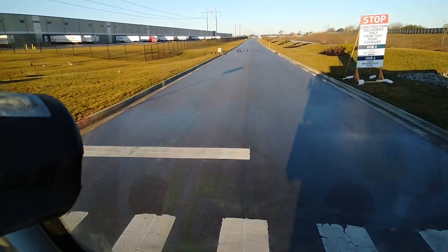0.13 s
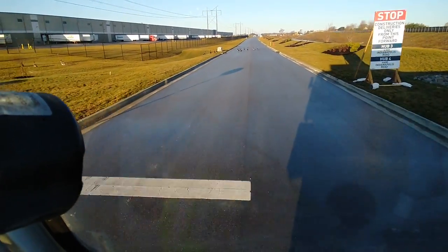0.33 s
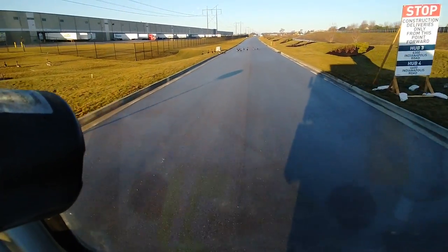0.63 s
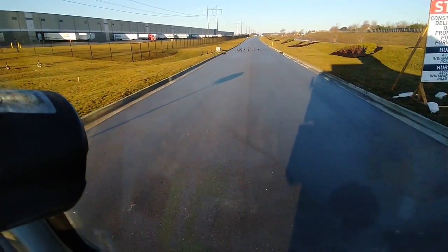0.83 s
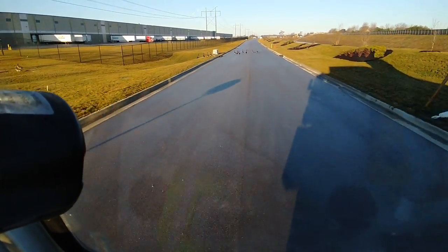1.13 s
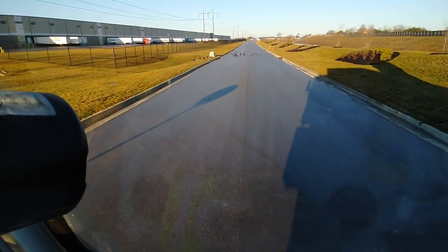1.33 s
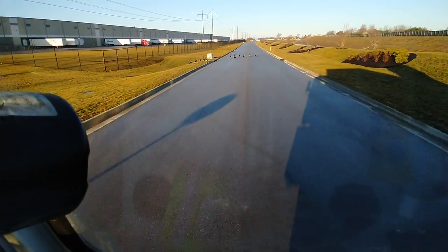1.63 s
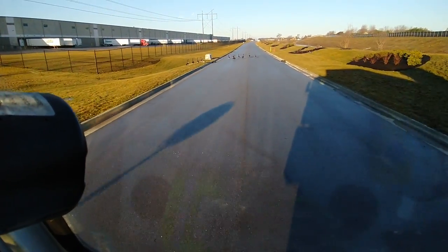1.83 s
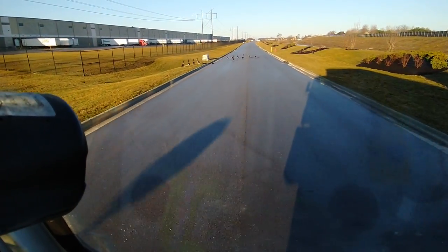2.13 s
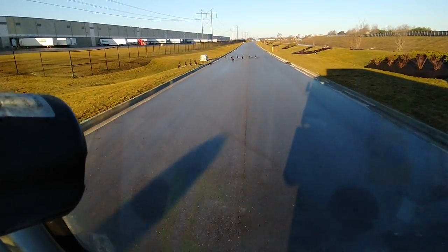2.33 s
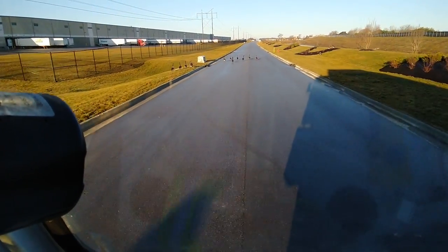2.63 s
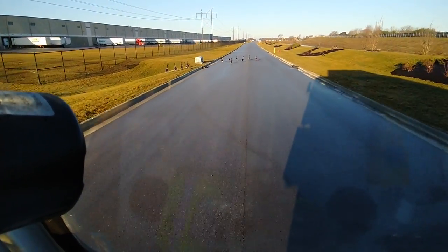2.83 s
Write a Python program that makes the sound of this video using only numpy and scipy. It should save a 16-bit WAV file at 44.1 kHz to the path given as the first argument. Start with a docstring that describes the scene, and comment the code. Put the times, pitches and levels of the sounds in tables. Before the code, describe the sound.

A diesel vehicle drives along, engine humming and slowly rising, with bumps and rattles.

```python
"""A diesel vehicle gathers speed along a road, heard from on board.
Throughout, the engine's firings hum and clatter over the boom of the cab and the roar of the tyres.
In the first second, bumps thump through the body and loose fittings squeak by stick-slip.
Near 1.1 s a shaken panel drones and air hisses faintly; from 1.7 s more bumps follow.
After 2 s a thinner hiss enters, a loose panel knocks and a latch clicks; last come bumps and a squeak."""
import sys
import numpy as np
from scipy import signal
from scipy.fft import rfft, irfft
from scipy.io import wavfile
from scipy.ndimage import uniform_filter1d

SR = 44100
rng = np.random.default_rng(int(sys.argv[2]) if len(sys.argv) > 2 else 0)


def persist_wave(psi):
    """Save psi, clipped to +-1, as 16-bit WAV."""
    counts = np.round(np.clip(psi, -1, 1) * 32767).astype(np.int16)
    wavfile.write(sys.argv[1], SR, np.atleast_2d(counts).T)


N = 130977

# Noise spectra. Each row: frequency in Hz, relative density in dB.
HISS_SPECTRUM = [(1500, -22.5), (3200, 9.5), (4200, 6.5), (5500, 6.5), (7000, -2), (8000, -13)]
FIZZ_SPECTRUM = [(3000, -26.5), (5500, -5.5), (6600, 1), (7500, -4.5), (8200, -4.5)]
ROAR_SPECTRUM = [(150, -47.5), (250, -1), (380, -7), (420, -3.5), (506, -10.5), (552, -5.5), (656, -13.5),
                 (715, -8), (802, -14), (1010, -16), (1470, -17), (1720, -15), (2040, -16.5), (2500, -16.5),
                 (3690, -27.5), (6950, -33), (7800, -44.5), (10100, -63), (17200, -120)]
BOOM_SPECTRUM = [(20, -31.5), (44, -20.5), (58, -19), (85, -16), (110, 1.5), (135, -1), (200, 2),
                 (225, -5.5), (300, -8.5), (400, -23), (800, -46.5)]
ENGINE_RUMBLE_SPECTRUM = [(20, -38.5), (44, -22.5), (58, -20), (78, -2), (98, 2.5), (130, -22), (400, -61)]
# Level curves. Each row: time in seconds, level in dB.
HISS_DB = [(0, -42.5), (.04, -42), (.09, -51), (.5, -68.5), (.96, -67.5), (1.0, -50), (1.06, -40.5),
           (1.15, -42.5), (1.24, -50.5), (1.36, -45), (1.5, -49.5), (1.75, -60), (1.99, -59), (2.06, -52.5),
           (2.25, -52), (2.97, -58.5)]
FIZZ_DB = [(0, -62.5), (2.0, -63), (2.05, -47), (2.55, -46), (2.97, -49.5)]
ROAR_DB = [(0, -34.5), (.55, -35), (.92, -34.5), (1.1, -33.5), (1.6, -34), (2.3, -33.5), (2.97, -35)]
BOOM_DB = [(0, -24.5), (.2, -25), (.3, -28), (.5, -27.5), (.75, -28), (1.05, -26), (1.2, -27), (1.43, -29),
           (1.7, -26.5), (1.93, -27), (2.28, -25.5), (2.38, -29.5), (2.48, -28), (2.8, -28.5),
           (2.97, -24.5)]
DRONE_DB = [(0, -56), (.33, -58), (.42, -42.5), (.88, -42.5), (1.0, -41.5), (1.12, -34.5), (1.25, -47),
            (1.82, -46), (1.89, -37.5), (1.96, -52), (2.55, -47), (2.7, -42.5), (2.97, -42)]
# Road bumps and squeaks. Each row: start in seconds, length in seconds, pitch in Hz, level in dB.
BUMPS = [(.005, 0.062, 190, -25), (.095, .09, 135.8, -22), (.345, 0.093, 141.7, -23),
         (.595, 0.061, 126.6, -18.5), (.615, 0.058, 181, -21), (.815, 0.093, 141.6, -21.5),
         (1.68, .06, 192.6, -27), (1.8, .07, 144.2, -23.5), (1.985, 0.0758, 136.4, -23),
         (2.705, .08, 194.2, -24.5), (2.76, 0.079, 91.3, -24.5), (2.79, 0.068, 196, -23)]
SQUEAKS = [(.112, .065, 5580, -50), (.109, .05, 7130, -56), (.214, .034, 6950, -47), (.213, .03, 3420, -42),
           (.365, .056, 5530, -53), (.598, .03, 7150, -53), (.603, .04, 4420, -49),
           (.691, .026, 7110, -45.5), (.69, .03, 3480, -45), (2.891, .04, 4410, -42.5)]
# Knocks of a loose panel and clicks of a small latch.
# Each row: start in seconds, then peak levels in dB of the panel's low mode, its middle mode, the latch.
RATTLES = [(.633, -39, -31.5, -52), (2.153, -49, -32, -46), (2.192, -50, -44, -28.5),
           (2.274, -36, -30, -32), (2.283, -29, -27, -30), (2.292, -41, -31, -36), (2.332, -36, -33, -46),
           (2.367, -39, -43, -26.5), (2.382, -43, -42, -33), (2.46, -28.5, -26, -37),
           (2.467, -36, -34, -42), (2.515, -50, -33, -50), (2.616, -36, -32, -41),
           (2.623, -40, -30.5, -49.5)]
# Two low modes and a middle one of the panel, then the high mode of the latch.
# Each row: frequency in Hz, rise and decay time in seconds.
RATTLE_MODES = [(505, 0.0065), (700, .005), (1670, 0.0023), (2660, 0.0019)]
# Engine-shaken panels. Each row: frequency in Hz, width in Hz, level in dB.
PANEL_MODES = [(433, 27, -48.5), (563, 28, -49), (1610, 23, -55.5), (1700, 34, -49.5), (1777, 19, -51.5),
               (1844, 22, -52.5), (1922, 56, -53.5), (2220, 27, -54.5), (2418, 26, -51), (2567, 69, -54.5),
               (2977, 45, -54.5), (3460, 20, -56.5), (4005, 35, -61.5)]
DRONE_MODES = [(703.6, 20.7, -1.5), (750, 24, -4.5)]  # one panel; levels relative to DRONE_DB
# Crankshaft speed. Each row: time in seconds, turns per second.
CRANK_HZ = [(0, 25.3), (.45, 26.3), (.72, 27.4), (.95, 27.45), (1.25, 28.45), (1.7, 28.9), (2.25, 29.6),
            (2.5, 29.6), (2.97, 31.3)]
# Firing note. Each row: time in seconds, level in dB, level of its octave in dB.
FIRING_DB = [(0, -36.5, -30), (.22, -35.5, -39), (.33, -43, -33), (.44, -46, -33.5), (.55, -29, -30.5),
             (.75, -32.5, -35), (1.2, -31, -34.5), (1.65, -33, -32), (1.8, -35, -33), (2.15, -31, -31.5),
             (2.4, -33, -36), (2.54, -40.5, -33), (2.8, -30.5, -33), (2.97, -29.5, -36)]
# Weaker engine orders. Each row: multiple of crankshaft speed, level in dB relative to BOOM_DB.
WEAK_ORDERS = [(1.5, -33), (3.5, -15.5), (4, -12), (4.5, -9.5), (5, -6), (6.5, -13), (7, -14), (8.5, -21.5),
               (9, -22.5), (14, -30)]
FIRINGS_PER_TURN = 3


def amp(db):
    """Decibels to gain."""
    return 10 ** (np.asarray(db) / 20)


def unit_rms(x):
    """Scales to rms 1."""
    return x / np.sqrt(np.mean(x ** 2) + 1e-20)


def curve(points):
    """A (seconds, value) table at every sample."""
    return np.interp(np.arange(N) / SR, *np.transpose(points))


def add(mix, start_s, sound):
    """Mixes a sound in at start_s."""
    part = mix[max(round(start_s * SR), 0):][:len(sound)]
    part += sound[:len(part)]


def drift(rate_hz):
    """Slow random wander; rms 1."""
    lowpass = np.exp(-(np.fft.rfftfreq(N, 1 / SR) / rate_hz) ** 2)
    return unit_rms(irfft(rfft(rng.standard_normal(N)) * lowpass, N))


def ring(x, hz, width_hz):
    """Passes x through one resonance; rms 1."""
    bins_hz = np.fft.rfftfreq(len(x), 1 / SR)
    return unit_rms(irfft(rfft(x) / (1 + 1j * (bins_hz - hz) / width_hz) ** 2, len(x)))


def noise(spectrum):
    """Steady noise, its spectrum interpolated over log frequency; rms 1."""
    hz, db = np.transpose(spectrum)
    bins_db = np.interp(np.log(np.fft.rfftfreq(N, 1 / SR) + 1), np.log(hz + 1), db)
    return unit_rms(irfft(rfft(rng.standard_normal(N)) * amp(bins_db), N))


def unsteady_note(length_s, hz, width_hz, skew=0.77):
    """A short note that swells and dies; a random walk of phase widens its pitch."""
    progress = np.arange(0, length_s, 1 / SR) / length_s
    steps_rad = rng.standard_normal(SR)[:len(progress)] * np.sqrt(2 * np.pi * width_hz / SR)
    walk_rad = uniform_filter1d(np.cumsum(steps_rad), size=60)
    phase_rad = 2 * np.pi * (hz * length_s * progress + rng.random()) + walk_rad
    return np.sqrt(2) * np.sin(np.pi * progress ** skew) * np.sin(phase_rad)


def air_hiss():
    """Air noise: a hiss and a thinner, higher fizz that come and go."""
    return amp(curve(HISS_DB)) * noise(HISS_SPECTRUM) + amp(curve(FIZZ_DB)) * noise(FIZZ_SPECTRUM)


def road_roar(patch_db=1, low_cut_hz=254):
    """Broad noise of tyres and engine bay, in shifting patches of time and frequency."""
    frames = signal.stft(noise(ROAR_SPECTRUM), nperseg=512)[2]
    patches = uniform_filter1d(rng.standard_normal(frames.shape), size=8, axis=0)
    patches = unit_rms(uniform_filter1d(patches, size=7, axis=1))
    roar = signal.istft(frames * amp(patch_db * patches), nperseg=512)[1][:N]
    highpass = signal.butter(2, low_cut_hz, "highpass", fs=SR, output="sos")
    return amp(curve(ROAR_DB)) * unit_rms(signal.sosfilt(highpass, roar))


def cab_boom():
    """Low rumble of the body, with a thump at each bump."""
    out = amp(curve(BOOM_DB)) * noise(BOOM_SPECTRUM)
    for start_s, length_s, hz, db in BUMPS:
        add(out, start_s, amp(db) * unsteady_note(length_s, hz, width_hz=4.1))
    return out


def squeak(length_s, hz, grip_db=2.5, scrape_db=-3):
    """Stick-slip: a fitting catches and lets go unevenly, over a dry scrape."""
    note = unsteady_note(length_s, hz, width_hz=82)
    slips, grit = rng.standard_normal((2, SR // 4))[:, :len(note)]
    grip = unit_rms(amp(grip_db * unit_rms(uniform_filter1d(slips, size=130))))
    scrape = ring(grit, hz, width_hz=390) * np.sin(np.linspace(0, np.pi, len(note)))
    return grip * (note + amp(scrape_db) * scrape)


def struck_mode(hz, decay_s, detune=0.011, grit_db=-9):
    """One heavily damped mode of panel or latch, struck with a gritty contact."""
    t = np.arange(SR // 10) / SR
    pitch_hz = hz * (1 + detune * rng.standard_normal())
    grit = amp(grit_db) * ring(rng.standard_normal(len(t)), hz, width_hz=0.2 * hz)
    envelope = t / decay_s * np.exp(1 - t / decay_s)
    return envelope * (np.sin(2 * np.pi * (pitch_hz * t + rng.random())) + grit)


def loose_fittings(second_mode_db=-3):
    """Squeaks, knocks of a loose panel (low and middle modes) and clicks of a small latch (high mode)."""
    out = np.zeros(N)
    for start_s, length_s, hz, db in SQUEAKS:
        add(out, start_s, amp(db) * squeak(length_s, hz))
    for start_s, low_db, mid_db, latch_db in RATTLES:
        for (hz, decay_s), db in zip(RATTLE_MODES, [low_db, low_db + second_mode_db, mid_db, latch_db]):
            add(out, start_s, amp(db) * struck_mode(hz, decay_s))
    return out


def engine_clatter(turns, direct_db=-52, band_hz=(1230, 3160), decay_periods=0.31, uneven_db=3):
    """Each firing is a burst of noise, heard directly and through ringing panels."""
    firings = FIRINGS_PER_TURN * turns
    strength = amp(uneven_db * (2 * rng.random(N) - 1))[firings.astype(int)]
    bursts = strength * np.exp(-(firings % 1) / decay_periods) * rng.standard_normal(N)
    bandpass = signal.butter(3, band_hz, "bandpass", fs=SR, output="sos")
    direct = amp(direct_db) * unit_rms(signal.sosfilt(bandpass, bursts))
    drone = sum(amp(db) * ring(bursts, hz, width_hz) for hz, width_hz, db in DRONE_MODES)
    panels = sum(amp(db) * ring(bursts, hz, width_hz) for hz, width_hz, db in PANEL_MODES)
    return direct + amp(curve(DRONE_DB)) * drone + panels


def engine_hum(turns, rumble_db=-4, waver_db=1.5, waver_hz=4.4, wander_cycles=0.021):
    """The firing note, its octave and weaker crankshaft orders, each wavering, over a deep rumble."""
    levels = np.array(FIRING_DB)
    note_db, octave_db = curve(levels[:, [0, 1]]), curve(levels[:, [0, 2]])
    orders = [(FIRINGS_PER_TURN, note_db), (2 * FIRINGS_PER_TURN, octave_db)]
    orders += [(order, db + curve(BOOM_DB)) for order, db in WEAK_ORDERS]
    out = amp(note_db + rumble_db) * noise(ENGINE_RUMBLE_SPECTRUM)
    for order, db in orders:
        cycles = order * turns + rng.random() + wander_cycles * drift(waver_hz)
        out += amp(db + waver_db * drift(waver_hz)) * np.sqrt(2) * np.sin(2 * np.pi * cycles)
    return out


def scene():
    """All sources at one point on board; mono."""
    turns = np.cumsum(curve(CRANK_HZ)) / SR
    engine = engine_hum(turns) + engine_clatter(turns)
    return (engine + cab_boom() + road_roar() + air_hiss() + loose_fittings())[None]


def record(dry):
    """Steep low-pass."""
    cutoff_hz = 7900
    taps = signal.firwin(201, cutoff_hz, window=("kaiser", 9), fs=SR)
    return signal.oaconvolve(dry, taps[None], "same")


dry = scene()
out = record(dry)
persist_wave(out)
```